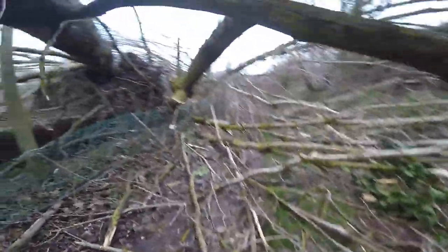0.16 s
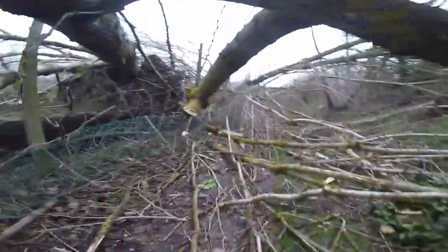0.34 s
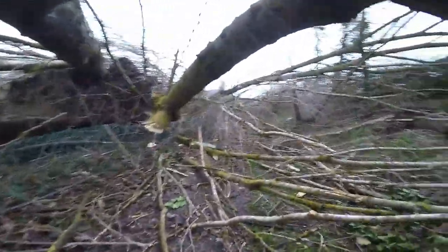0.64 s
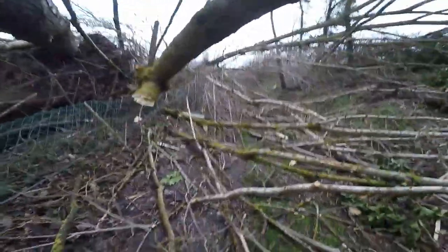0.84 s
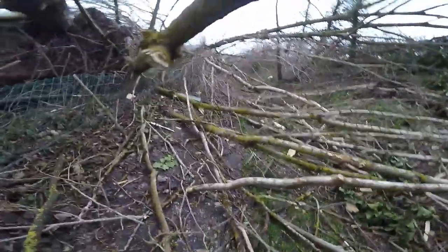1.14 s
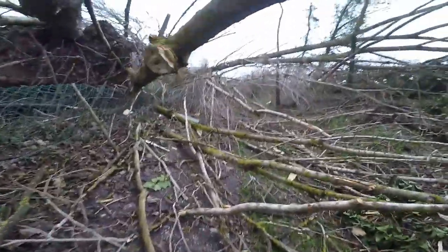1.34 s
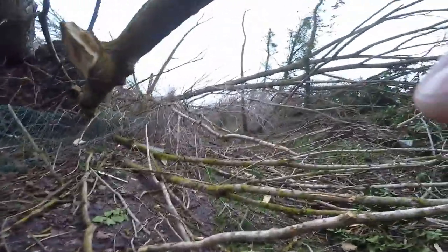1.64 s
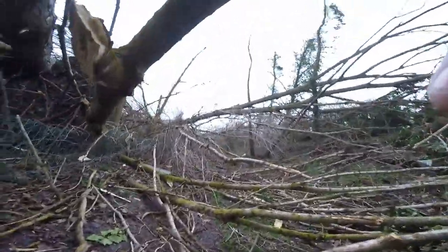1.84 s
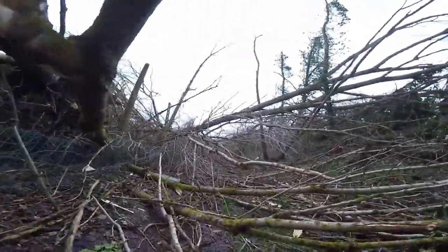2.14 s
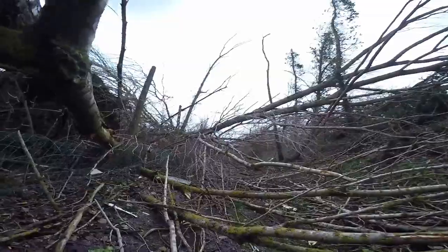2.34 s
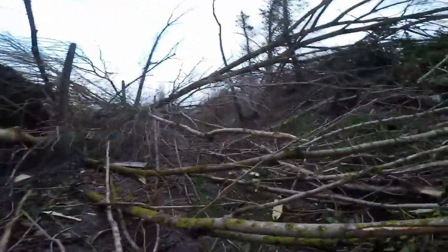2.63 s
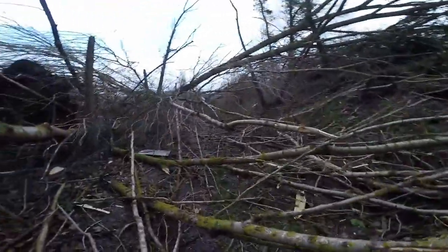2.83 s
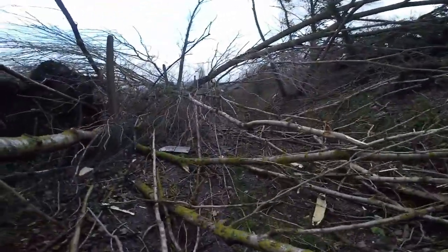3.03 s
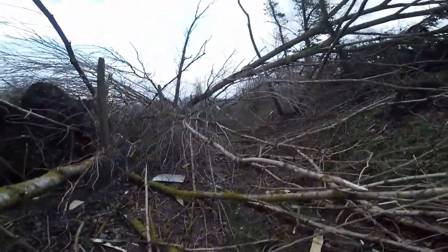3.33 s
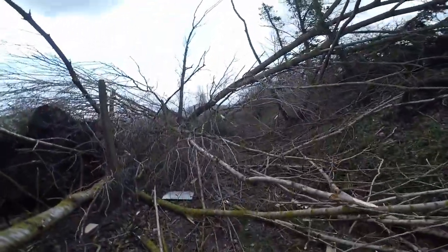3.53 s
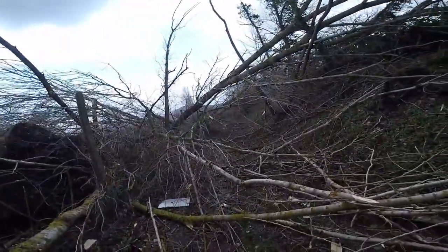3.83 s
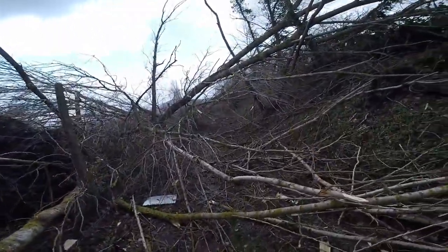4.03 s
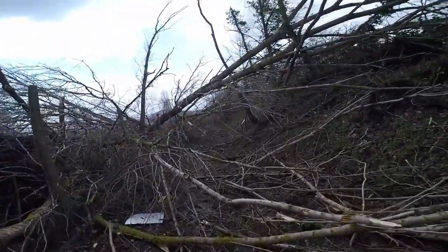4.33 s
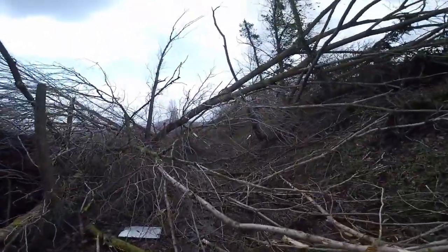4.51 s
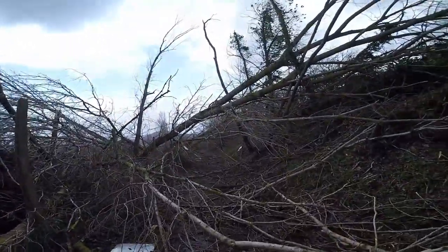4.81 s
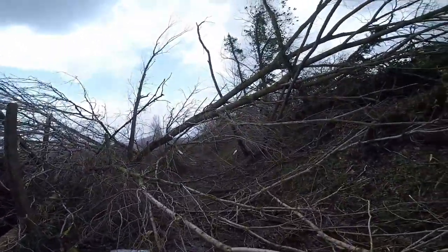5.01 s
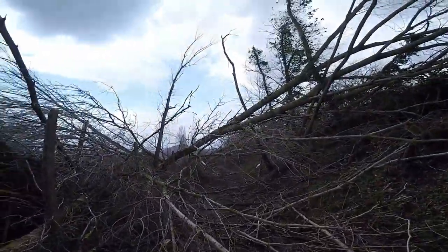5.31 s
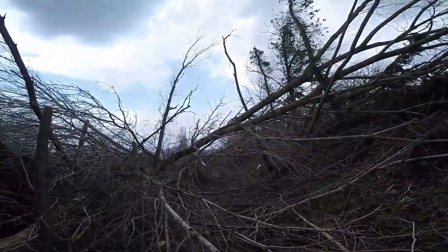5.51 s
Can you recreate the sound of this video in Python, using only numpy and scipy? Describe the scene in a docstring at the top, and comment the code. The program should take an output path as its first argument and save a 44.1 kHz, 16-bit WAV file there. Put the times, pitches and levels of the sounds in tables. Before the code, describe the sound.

On an open, windy slope of fallen trees, wind rumbles low against the microphone over a faint outdoor hush. Dry brush rustles and twigs tick quietly, then limbs crack sharply, the loudest about halfway through. A strong buffeting gust follows, then another heavy double crack, and the wind keeps swelling to the end.

```python
"""Someone pushes through the branches of fallen trees on a windy slope, under a steady outdoor hush.
Wind noise rumbles and brush rustles throughout (shaped noise, dense fine ticks); small twigs tick from 0.2 s.
Limbs crack (short noise bursts ringing the wood, echoed by decaying noise) at 1.84 s, 2.4 s and 2.9 s.
The loudest crack comes near 3.03 s, the strongest gust near 4.1 s, and a last group of cracks at 4.4 s.
Twigs tick on to 4.8 s; two more gusts swell at 5.25 s and at the end."""
import sys
import numpy as np
from scipy import signal
from scipy.fft import rfft, irfft
from scipy.io import wavfile
from scipy.ndimage import uniform_filter1d

SR = 44100
rng = np.random.default_rng(int(sys.argv[2]) if len(sys.argv) > 2 else 0)


def dump_mix(stems):
    """Bounce the given channels to the path in sys.argv[1] as a 16-bit WAV at rate SR."""
    frames = np.atleast_2d(stems).T  # one column per channel
    limited = np.clip(frames, -1, 1)  # hard clip at full scale
    pcm = np.round(limited * 32767).astype(np.int16)
    wavfile.write(sys.argv[1], SR, pcm)


N = 249602


def from_db(db):
    """Decibels to amplitude gain."""
    return 10 ** (np.asarray(db) / 20)


def rms_one(x):
    """Scale to unit power."""
    return x / np.sqrt(np.mean(x ** 2) + 1e-20)


def in_time(rows):
    """Interpolate each column after the first (seconds) at every sample."""
    s, *columns = np.transpose(rows)
    return [np.interp(np.arange(N) / SR, s, column) for column in columns]


def cut(x, hz, kind, order=2):
    """Butterworth filter with its edges kept in range."""
    edges_hz = np.clip(hz, 10, .45 * SR)
    return signal.sosfilt(signal.butter(order, edges_hz, kind, fs=SR, output="sos"), x)


def mode(x, hz, width_hz):
    """One ringing resonance, gain 1 at its peak."""
    b, a = signal.iirpeak(min(hz, .45 * SR), hz / width_hz, fs=SR)
    return signal.lfilter(b, a, x)


def resonance(x, hz, width_hz, db):
    """Raise a band by a ringing peak."""
    return x + (from_db(db) - 1) * mode(x, hz, width_hz)


def drift(rate_hz):
    """Slow random curve through normal points of spread 1, rate_hz points a second."""
    points = rng.standard_normal(400)
    return np.interp(np.arange(N) / SR * rate_hz % 399, np.arange(400), points)


def noise(spectrum):
    """Unit-rms noise with a (Hz, dB) spectrum, falling away beyond its ends."""
    hz, db = np.transpose(spectrum)
    f = np.maximum(np.fft.rfftfreq(N, 1 / SR), 1)
    skirts = np.minimum(f / hz[0], 1) ** 2 * np.minimum(hz[-1] / f, 1) ** 2
    gain = from_db(np.interp(np.log(f), np.log(hz), db)) * skirts
    return rms_one(irfft(rfft(rng.standard_normal(N)) * gain, N))


def even(x, span_s):
    """Hold the power of a turbulent flow steady over a short span."""
    power = uniform_filter1d(x ** 2, max(int(span_s * SR), 2))
    return x / np.sqrt(power + 1e-6)


def swell(s, length_s):
    """Gaussian rise and fall of height 1, standard deviation length_s."""
    return np.exp(-.5 * ((np.arange(N) / SR - s) / length_s) ** 2)


def add(out, s, sound):
    """Mix a sound in at s seconds."""
    i = int(s * SR)
    out[i:i + len(sound)] += sound[:N - i]


def far_air(hush_db=-47, hum_hz=602, hum_db=-55):
    """Outdoor hush of shaped noise, with a faint distant hum of narrow-band noise that wavers."""
    # Each row: frequency in Hz, relative density in dB per Hz.
    hush_spectrum = [(150, -1.5), (400, 5), (700, 3), (1100, -2.5), (2000, -9), (4000, -12.5),
                     (7000, -23.5), (14000, -26.5), (16000, -82)]
    hum = even(cut(rng.standard_normal(N), [hum_hz - 10, hum_hz + 10], "band"), span_s=0.057)
    hush = from_db(hush_db + .5 * drift(6.98)) * noise(hush_spectrum)
    return hush + from_db(hum_db) * hum


def airflow(unsteady_db=2.5):
    """Strength of the rumble and of its finer flutter: breeze and gusts add in power."""
    # Steady wind on the microphone. Each row: time in seconds, rumble in dB before drift and trim.
    breeze = [(0, -36.5), (.22, -26.5), (1.0, -29.5), (1.42, -28.5), (1.9, -36), (2.15, -30.5), (2.9, -35),
              (3.7, -32), (4.3, -22.5), (4.75, -25), (5.66, -22)]
    # Bell-shaped gusts. Each row: peak time in seconds, rumble in dB before trim,
    # standard deviation in seconds, flutter relative to rumble in dB before trim.
    gusts = [(0.337, -15, 0.022, -22), (0.468, -17.5, 0.08, -34), (0.72, -19.5, .05, -14.5),
             (1.524, -20, 0.022, -17), (2.55, -26, 0.047, -28), (3.575, -18, 0.044, -14),
             (4.136, -9.5, 0.062, -7.5), (4.439, -16.5, 0.072, -9), (5.25, -23, 0.045, -31),
             (5.65, -14.5, .03, -16)]
    # flutter level at a given rumble level, and dB gained per dB of rumble
    base_flutter_db, at_rumble_db, flutter_growth = -38, -23, 0.64
    breeze_db = in_time(breeze)[0] + unsteady_db * drift(16)
    rumble_power = from_db(breeze_db) ** 2
    flutter_power = from_db(base_flutter_db + flutter_growth * (breeze_db - at_rumble_db)) ** 2
    for s, db, length_s, flutter_db in gusts:
        shape = swell(s, length_s)
        gust = from_db(db) * shape
        rumble_power = rumble_power + gust ** 2
        gust_flutter = from_db(flutter_db) * gust * shape ** .7   # crowds into the peak
        flutter_power = flutter_power + gust_flutter ** 2
    return np.sqrt(rumble_power), np.sqrt(flutter_power)


def wind(rumble_db=-1.5, flutter_db=-2, lumpy_db=2.5, eddy_db=14, eddy_width=0.53):
    """Eddies tumble over the microphone: low rumble, higher flutter and short pitched buffets."""
    # Each row: frequency in Hz, relative density in dB per Hz.
    rumble_spectrum = [(15, -9.5), (28, 6.5), (42, 1), (55, 1.5), (85, -6.5), (120, -13.5), (180, -23.5),
                       (300, -49)]
    # Each row: frequency in Hz, relative density in dB per Hz.
    flutter_spectrum = [(70, 0), (130, 1), (220, 0.5), (350, -8), (500, -16.5), (800, -21.5), (1600, -100)]
    # Sharp buffets. Each row: peak time in seconds, level in dB, standard deviation in seconds,
    # eddy pitch in Hz, high edge in Hz.
    buffets = [(0.339, -25, 0.011, 110, 130), (0.399, -25, 0.0063, 110, 130),
               (0.628, -26.5, 0.0047, 150, 190), (0.702, -20.5, 0.013, 120, 190),
               (3.543, -19.5, 0.0054, 200, 320), (4.026, -20, 0.0047, 130, 198),
               (4.063, -26, 0.0018, 300, 600), (4.109, -11.5, .008, 130, 180),
               (4.127, -12, 0.0056, 303, 650), (4.165, -16.5, 0.018, 280, 540),
               (4.374, -24.5, .004, 220, 280), (4.477, -22, 0.0031, 250, 342),
               (4.588, -20, 0.0054, 129, 169)]
    rumble, flutter = airflow()
    out = rumble * from_db(rumble_db) * even(noise(rumble_spectrum), span_s=0.082)
    flutter_gain = flutter * from_db(flutter_db + lumpy_db * drift(60))
    out += flutter_gain * even(noise(flutter_spectrum), span_s=0.08)
    for s, db, length_s, eddy_hz, high_hz in buffets:
        eddy = cut(cut(rng.standard_normal(N), 67, "high"), high_hz, "low")
        eddy = resonance(eddy, eddy_hz, eddy_width * eddy_hz, eddy_db)   # eddy size sets pitch
        eddy = even(cut(eddy, 2 * high_hz, "low"), span_s=0.0123)
        out += from_db(db) * eddy * swell(s, length_s)
    return out


def fracture(tear_s, low_hz, high_hz, woody, rings, ring_share=0.17, size=4096):
    """Fibres fail in a short dense cascade that rings the wood; energy of unit power lasting 4 ms."""
    # Dry-wood resonances. Each row: frequency in Hz, width in Hz, gain in dB before the woody factor.
    wood_modes = [(660, 150, 3.5), (1130, 120, 5.5), (1680, 120, 0.5), (2200, 220, -2.5), (3020, 500, 2),
                  (4200, 280, -8), (5300, 260, -18)]
    t = np.arange(size) / SR
    tearing = 1 / (1 + (t / tear_s) ** 3)
    fibres = rng.standard_normal(size)
    for _ in range(2):   # flatten the spectrum: each fibre's crack is broadband
        phase = np.angle(rfft(fibres * tearing))
        fibres = irfft(np.exp(1j * phase)) * np.exp(-t / (5 * tear_s))
    ringing = sum(from_db(db) * mode(fibres, hz, width_hz) for hz, width_hz, db in wood_modes)
    fibres = fibres + woody * ringing
    for hz, db in rings:   # set by the length of this piece
        fibres = resonance(fibres, hz, ring_share * hz, db)
    crack = cut(cut(cut(fibres, low_hz, "high"), high_hz, "low"), 2 * high_hz, "low")
    return crack / np.sqrt(np.sum(crack ** 2) / (.004 * SR))


def brush(level_db=2, ticks_per_s=90, tick_db=-12, spread_db=3):
    """Dry leaves hiss, and fine twigs tick against each other more often as they stir."""
    # Stirring. Each row: time in seconds, level in dB before level_db is added.
    stirring = [(0.0, -53), (0.43, -55.5), (0.84, -51.5), (1.17, -56), (1.5, -55.5), (1.8, -51),
                (2.11, -55.5), (2.43, -54.5), (2.59, -50.5), (2.96, -50.5), (3.2, -56), (3.41, -58),
                (3.78, -55.5), (4.21, -54), (4.36, -53), (4.49, -51.5), (4.76, -57), (5.66, -54)]
    # Each row: frequency in Hz, relative density in dB per Hz.
    leaf_spectrum = [(700, 5.5), (1400, 6.5), (3500, 0.5), (5500, -2.5), (8000, -9.5), (15000, -20)]
    level = from_db(in_time(stirring)[0] + level_db)
    born = rng.random(N) < ticks_per_s * rms_one(level) / SR
    ticks = born * from_db(spread_db * np.minimum(rng.exponential(1, N), 3))
    dealt = rng.integers(0, 6, N)   # each tick gets one of six pitches
    rustle = 0
    for k, hz in enumerate(np.geomspace(1300, 6000, 6)):
        tick = fracture(0.0023, 690, 2 * hz, woody=0.18, rings=[(hz, 9)])
        rustle = rustle + signal.fftconvolve(ticks * (dealt == k), tick)[:N]
    hiss = noise(leaf_spectrum) * from_db(0.13 * drift(25))
    return level * (hiss + from_db(tick_db) * rms_one(rustle))


def woodland(x, onset_s=0.00066, size=22050):
    """Countless small echoes from ground, trunks and brush: decaying noise in bands."""
    # Each row: low edge in Hz, high edge in Hz (both limited by the filter), level in dB before
    # bandwidth scaling, 60 dB decay time in seconds.
    scatter = [(294, 48000, -8.5, 0.042), (1400, 5400, -12, 0.21), (6000, 15000, -12.5, 0.19)]
    t, echoes = np.arange(size) / SR, 0
    for low_hz, high_hz, db, t60_s in scatter:
        tail = cut(rng.standard_normal(size), [low_hz, high_hz], "band")
        tail = tail * from_db(-60 * t / t60_s) * (1 - np.exp(-t / onset_s))
        band_share = abs(high_hz - low_hz) / (SR / 2)
        echoes = echoes + from_db(db) * tail / np.sqrt(np.sum(tail ** 2)) * np.sqrt(band_share)
    return signal.fftconvolve(x, echoes)[:N]


def breaking_wood(twig_ring_db=9, splinter_db=-27, splinter_s=.022, count=5):
    """Thick limbs crack and shed a few splinters; thin twigs tick."""
    # Limbs. Each row: start in seconds, level in dB, tearing time in seconds, low edge in Hz,
    # high edge in Hz, wood resonance strength (ratio), low ring in Hz, its lift in dB,
    # high ring in Hz, its lift in dB.
    snaps = [(1.8359, -30, 0.004, 1500, 15000, 0.1, 5250, 6, 13000, 4),
             (1.8388, -13, 0.0018, 600, 19600, 0.1, 5160, 11, 12800, 8),
             (1.842, -21, 0.002, 400, 15000, 0.1, 536, 20.5, 3200, 11),
             (2.3912, -22, 0.0036, 340, 12000, 0.073, 1510, 11.5, 5900, 6.5),
             (2.9036, -21, 0.0039, 1100, 8000, 0.35, 2560, 4.5, 3980, 9),
             (2.9974, -31.5, 0.0036, 1100, 9000, 0.64, 1200, 5, 4230, 9),
             (3.0099, -23, 0.0061, 1100, 11000, 1.1, 3200, 1, 6400, -9),
             (3.0182, -29, 0.004, 900, 10000, .7, 3020, 4, 4200, -7),
             (3.024, -21, 0.0063, 1500, 14000, 0.39, 3070, 18, 5500, -6),
             (3.028, -6, 0.0018, 171, 9000, 0.32, 1130, 5.5, 5200, 7),
             (3.039, -26, 0.0071, 1400, 8000, 0.57, 2780, 24, 3970, 15),
             (4.4027, -7, 0.0026, 240, 5130, 0.87, 1820, 3.5, 3200, 2.5),
             (4.4110, -26, 0.0028, 900, 7000, .8, 2000, 7, 4200, 0),
             (4.4248, -15, 0.00084, 1500, 8100, 0.23, 2130, 7, 5770, -1)]
    # Each row: start in seconds, level in dB, tearing time in seconds, ring in Hz, high edge in Hz.
    twigs = [(0.203, -38.5, 0.0011, 1500, 7650), (0.562, -42, 0.0018, 1550, 3500),
             (0.928, -36.5, 0.0024, 800, 2200), (0.945, -42, 0.0073, 2760, 4500),
             (0.958, -35.5, 0.01, 1030, 4740), (.985, -38.5, 0.0028, 6000, 11000),
             (1.1194, -50, .003, 9100, 14000), (1.461, -46.5, 0.0027, 1340, 8950),
             (1.562, -40.5, 0.013, 1980, 6000), (1.6013, -41, 0.003, 1880, 3000),
             (1.742, -32.5, 0.012, 1540, 2200), (1.7510, -36, 0.0076, 1890, 6640),
             (1.7796, -41.5, 0.0024, 1400, 8050), (1.9055, -37, 0.0026, 4960, 17000),
             (1.9406, -35, 0.0042, 1770, 12000), (2.5123, -46, 0.0038, 3900, 12000),
             (2.63, -49, .001, 12000, 14000), (2.952, -44, 0.0024, 4500, 9000),
             (3.188, -41, 0.0061, 1900, 4000), (3.503, -44.5, 0.003, 2150, 2500),
             (3.993, -43.5, 0.0024, 2470, 2950), (4.207, -36, 0.034, 3100, 11400),
             (4.2975, -34.5, 0.0014, 1300, 1590), (4.73, -46.5, .002, 6000, 7000),
             (4.759, -38.5, 0.004, 700, 1190)]
    out = np.zeros(N)
    for s, db, tear_s, low_hz, high_hz, woody, *rings in snaps:
        ring_pairs = zip(rings[::2], rings[1::2])
        add(out, s, from_db(db) * fracture(tear_s, low_hz, high_hz, woody, ring_pairs))
        waits = 0.29 + rng.exponential(1, count)   # in units of splinter_s
        for wait, pitch_hz in zip(waits, rng.uniform(2100, 5900, count)):
            splinter = fracture(0.00079, low_hz=1500, high_hz=12000, woody=0, rings=[(pitch_hz, 9)])
            gain = from_db(db + splinter_db - 3.6 * wait)   # later ones are weaker
            add(out, s + wait * splinter_s, gain * splinter)
    for s, db, tear_s, ring_hz, high_hz in twigs:
        twig = fracture(tear_s, low_hz=650, high_hz=high_hz, woody=0.35, rings=[(ring_hz, twig_ring_db)])
        add(out, s, from_db(db) * twig)
    return out


def scene():
    """Distant air, wind and brush under snaps and their echoes."""
    wood = breaking_wood()
    return (wood + woodland(wood) + brush() + wind() + far_air())[None]


def record(dry, cutoff_hz=15600):
    """The microphone saturates smoothly toward full scale; a steep low-pass cuts the top."""
    held = dry / (1 + dry ** 6) ** (1 / 6)
    return signal.sosfilt(signal.ellip(12, .2, 100, cutoff_hz, fs=SR, output="sos"), held)


dry = scene()
out = record(dry)
dump_mix(out)
```